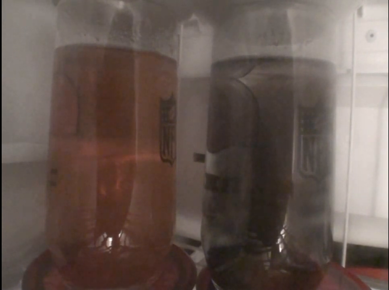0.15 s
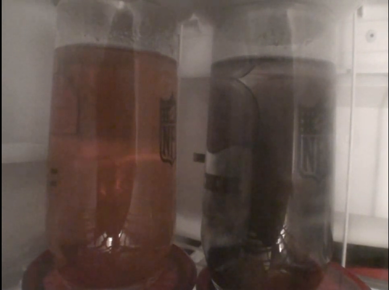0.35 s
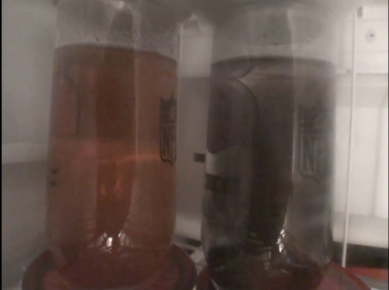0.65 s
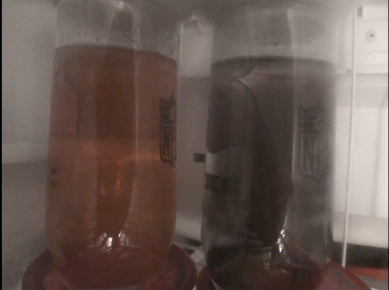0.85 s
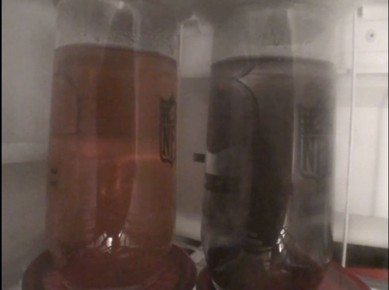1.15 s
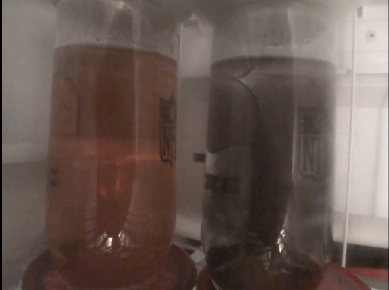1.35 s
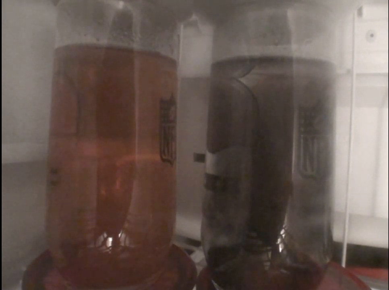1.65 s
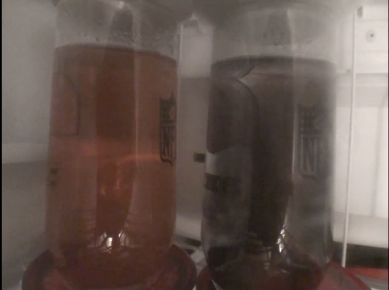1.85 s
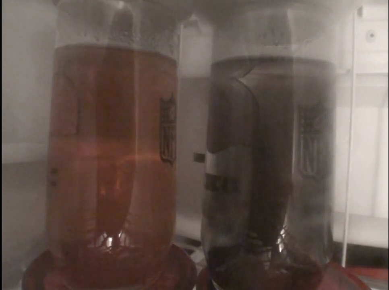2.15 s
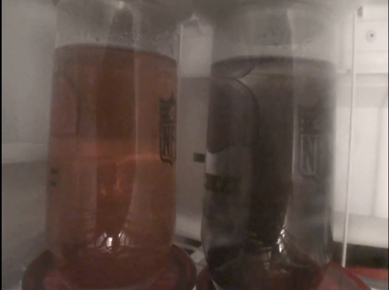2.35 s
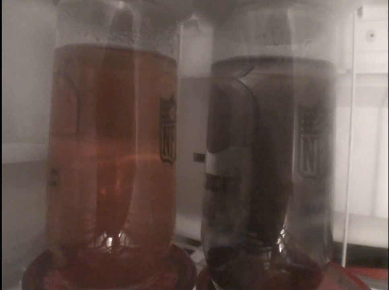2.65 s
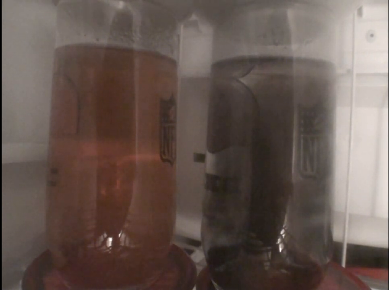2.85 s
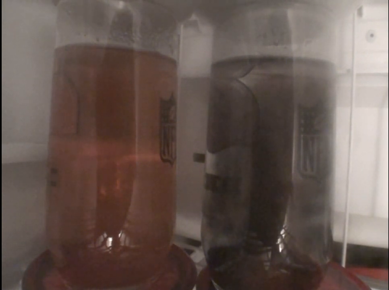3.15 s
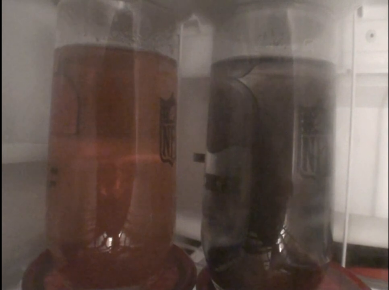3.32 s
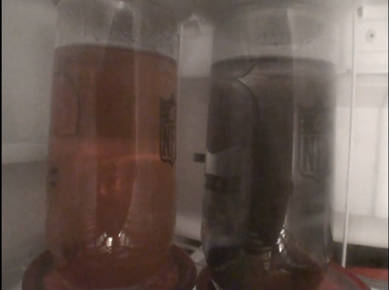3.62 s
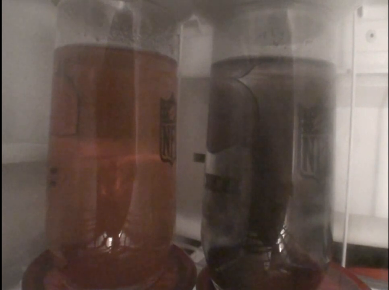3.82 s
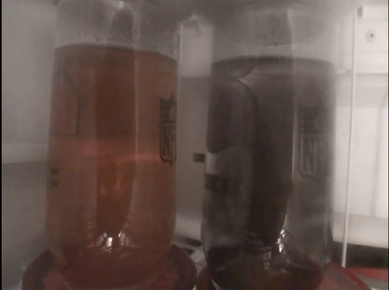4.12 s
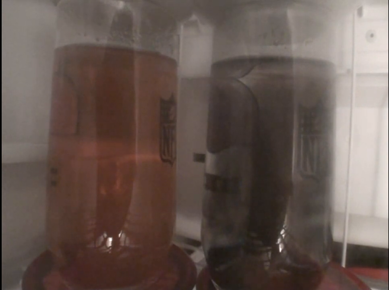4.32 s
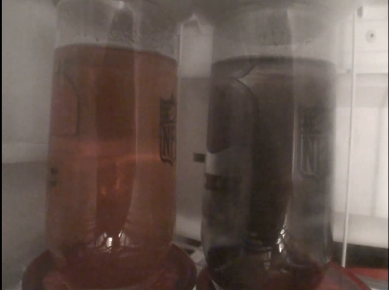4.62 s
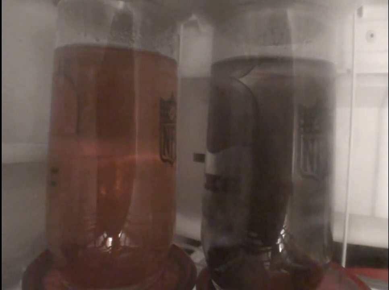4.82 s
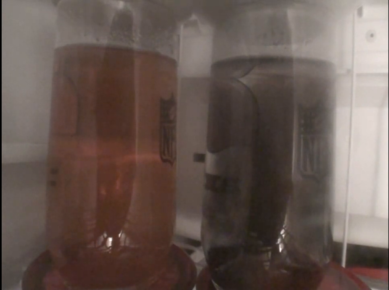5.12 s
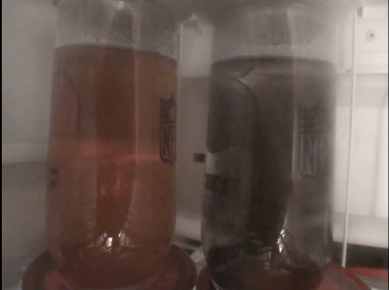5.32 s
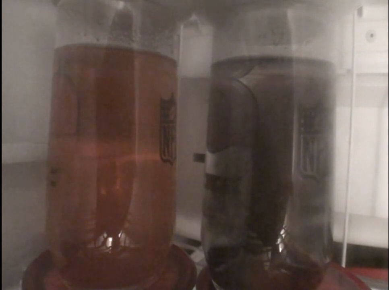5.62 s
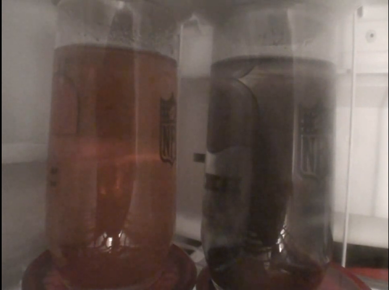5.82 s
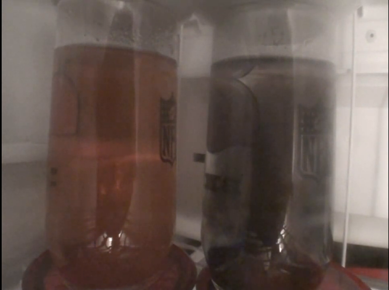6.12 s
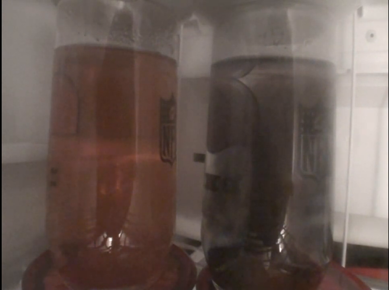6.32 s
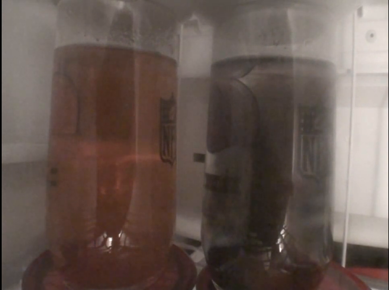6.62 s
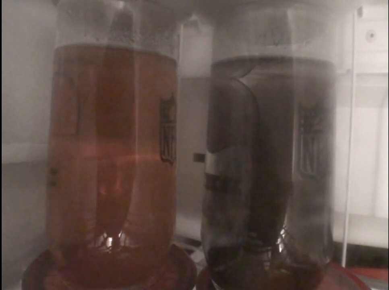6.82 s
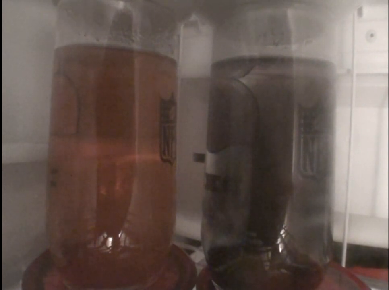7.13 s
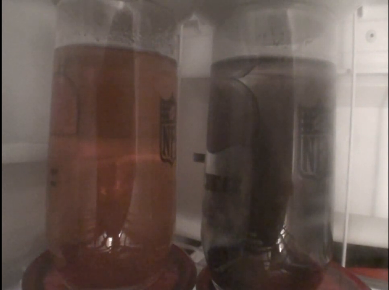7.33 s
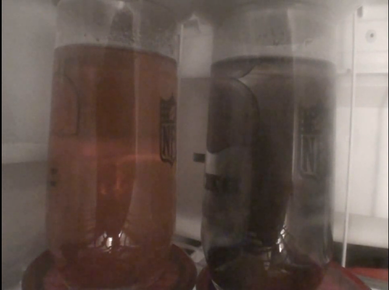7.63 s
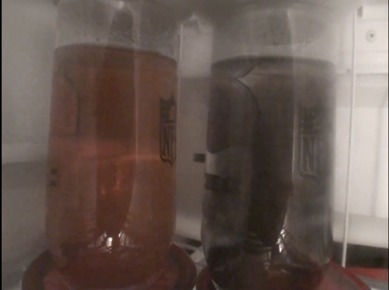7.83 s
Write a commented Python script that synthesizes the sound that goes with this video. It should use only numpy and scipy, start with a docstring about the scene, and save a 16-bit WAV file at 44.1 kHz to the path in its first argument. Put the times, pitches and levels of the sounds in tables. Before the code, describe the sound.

Inside a closed running freezer, a steady low compressor hum and a droning fan whir blend with boxy rushing air, unchanging throughout.

```python
"""Inside a running freezer

A small camera with two microphone ports stands in the closed cabinet, close to all its walls.
A three-blade fan blows: blade tones and turbulent rush ring in the air modes of the cabinet.
The compressor hums through the walls as one low tone; scattered rush fills in behind.
The ports sit at different spots of each mode, so left and right hear different colours."""
import sys
import numpy as np
from scipy import signal
from scipy.fft import rfft, irfft, next_fast_len
from scipy.io import wavfile

SR = 44100
rng = np.random.default_rng(int(sys.argv[2]) if len(sys.argv) > 2 else 0)


def dump_mix(stems):
    """Bounce the given channels to the path in sys.argv[1] as a 16-bit WAV at rate SR."""
    frames = np.atleast_2d(stems).T  # one column per channel
    limited = np.clip(frames, -1, 1)  # hard clip at full scale
    pcm = np.round(limited * 32767).astype(np.int16)
    wavfile.write(sys.argv[1], SR, pcm)


N = 351477
PAD = next_fast_len(N + SR // 2)  # working length in samples, at least half a second over N

# Air modes of the cabinet, gains at resonance before the fan's treble roll-off:
# f/Hz, width/Hz, left level/dB, right level/dB, left sign, right sign
CABINET_MODES = [(37, 45, -58.5, -60.5, -1, -1), (106.2, 27.1, -32.5, -34.5, -1, -1),
                 (157.9, 11, -40, -46, 1, 1), (205.4, 38, -37, -40, 1, 1), (227, 12.2, -43.5, -49, 1, 1),
                 (296.2, 32, -43, -55.5, -1, -1), (359, 51, -56.5, -53.5, -1, -1),
                 (452, 36.6, -62.5, -50.5, -1, -1), (530, 115, -65, -62, 1, -1),
                 (620.2, 29, -51, -52.5, 1, 1), (665.2, 45.2, -44.5, -42.5, 1, 1),
                 (706, 168, -45, -44, -1, -1), (878, 177, -46.5, -47, 1, 1), (972, 47, -51, -50.5, -1, -1),
                 (1096, 56, -51.5, -52, 1, 1), (1219, 45, -61.2, -55.5, 1, 1),
                 (1295, 88, -54.5, -54.5, 1, 1), (1472, 45, -57, -73.5, -1, 1),
                 (1556, 87, -60.5, -53, -1, 1), (1827, 67, -69.5, -47, -1, -1),
                 (2075, 1070, -56.5, -53.5, -1, -1), (2151, 140, -42.5, -41, 1, 1),
                 (2370, 55, -59, -52.5, -1, -1), (2725, 350, -64, -61.5, 1, 1),
                 (3520, 140, -50.5, -51.5, 1, -1), (3834, 354, -58.5, -56, 1, 1),
                 (4340, 179, -56.5, -63, 1, 1), (5000, 1097, -79, -65, 1, 1),
                 (6190, 330, -67.5, -63.5, -1, 1), (7540, 499, -66, -66, -1, 1)]
# Spectrum of the scattered rush at each port: f/Hz, level/dB (per Hz)
SCATTER_SPECTRUM = [(20, -78.5), (60, -76.5), (150, -55.5), (350, -60.5), (800, -75), (1500, -66),
                    (2200, -60), (3000, -87), (3800, -72.5), (5000, -90), (8000, -102.6), (12500, -120.1)]
# Fan tones: multiple of the shaft speed, level/dB (over the rush in 1 Hz)
FAN_TONE_LEVELS = [(1, 12), (3, 20.5), (6, 11.5), (9, 6), (12, 2)]

FAN_HZ, BLADES = 49.28, 3  # shaft turns per second, blades on the shaft
CHOP_CORNER_HZ = 3500  # the finest eddies, above this, are not chopped by the blades
COMPRESSOR_HZ, COMPRESSOR_DB = 52.82, 20  # level over the rush in 1 Hz
RUSH_CORNER_HZ = 1326  # sound through the cabinet falls off above this
LEFT_LAG_S, LEFT_BASS_HZ = 6.6e-5, 12  # the left port hears later and loses a little more bass
CEILING, EDGE_HZ = 1.6, 12820  # soft limit in amplitude, top of the microphone band


def rush(turns, chop, swell_db):
    """Turbulence of unit power per Hz; each passing blade chops its larger eddies a little."""
    hz = np.fft.rfftfreq(PAD, 1 / SR)
    air = np.sqrt(SR / 2) * rng.standard_normal(PAD)
    large_eddies = irfft(rfft(air) / (1 + (hz / CHOP_CORNER_HZ) ** 4), PAD)
    blade_passing = np.cos(2 * np.pi * BLADES * turns)
    swell = gain_of(swell_db * drift(0.303, 4.0))
    return (air + chop * blade_passing * large_eddies) * swell


def fan_tones(turns):
    """Shaft and blade tones; uneven inflow makes each one waver in strength."""
    tones = np.zeros(PAD)
    for order, db in FAN_TONE_LEVELS:
        level = gain_of(db + 1.1 * drift(0.398, 3.3))
        phase = order * turns + rng.random()
        tones += np.sqrt(2) * level * np.sin(2 * np.pi * phase)  # root 2: level is rms
    return tones


def compressor():
    """One tone of steady pitch at the speed of the pump, its level wavering slightly."""
    level = gain_of(COMPRESSOR_DB + 0.6 * drift(0.44, 3.0))
    phase = COMPRESSOR_HZ * np.arange(PAD) / SR + rng.random()
    return np.sqrt(2) * level * np.sin(2 * np.pi * phase)


def cabinet(source):
    """Sums the air modes at each port; neighbours of unlike phase cancel and leave notches."""
    hz = np.fft.rfftfreq(PAD, 1 / SR)
    ports = 0
    for mode_hz, width, left_db, right_db, left_sign, right_sign in CABINET_MODES:
        ring = width * hz / (mode_hz ** 2 - hz ** 2 + 1j * width * hz)
        port_gains = np.sign([left_sign, right_sign]) * gain_of([left_db, right_db])
        ports = ports + np.outer(port_gains, ring)
    left_delay = np.exp(-2j * np.pi * hz * LEFT_LAG_S)
    left_bass_cut = hz / (hz - 1j * LEFT_BASS_HZ)
    ports[0] *= left_delay * left_bass_cut
    rolloff = 1 / (1 + (hz / RUSH_CORNER_HZ) ** 2)
    return irfft(ports * rfft(source) * rolloff, PAD)


def scatter(turns):
    """Rush from many small reflections: separate turbulence per port, chopped in step by the blades."""
    hz = np.fft.rfftfreq(PAD, 1 / SR)
    point_hz, point_db = np.transpose(SCATTER_SPECTRUM)
    colour = gain_of(np.interp(np.log(hz + 1), np.log(point_hz), point_db))  # + 1 avoids log of 0
    port_rush = [rush(turns, chop=0.12, swell_db=-0.03) for port in range(2)]
    return irfft(colour * rfft(port_rush), PAD)


def drift(low_hz, high_hz):
    """Slow random wander of rms 1: sines of random phase, the slower ones stronger."""
    t = np.arange(0, PAD + 256, 256) / SR  # coarse time grid
    rates = np.geomspace(low_hz, high_hz, num=24)
    wave = sum(np.sin(2 * np.pi * (f * t + rng.random())) / np.sqrt(f) for f in rates)
    return np.interp(np.arange(PAD) / SR, t, wave / wave.std())


def gain_of(db):
    """Decibels to amplitude."""
    return 10 ** (np.asarray(db) / 20)


def scene():
    """Fan and compressor excite the cabinet; scattered rush fills in."""
    # the shaft runs slightly ahead or behind
    turns = FAN_HZ * np.arange(PAD) / SR + 0.012 * drift(0.3, 2.0)
    source = rush(turns, chop=0.2, swell_db=0.68) + fan_tones(turns) + compressor()
    return (cabinet(source) + scatter(turns))[:, :N]


def record(dry):
    """The microphones: a soft ceiling on the highest peaks, then the band limit."""
    held = CEILING * np.tanh(dry / CEILING)
    band_limit = signal.firwin(511, EDGE_HZ, window=("kaiser", 9), fs=SR)
    return signal.oaconvolve(held, band_limit[None], "same")


dry = scene()
out = record(dry)
dump_mix(out)
```